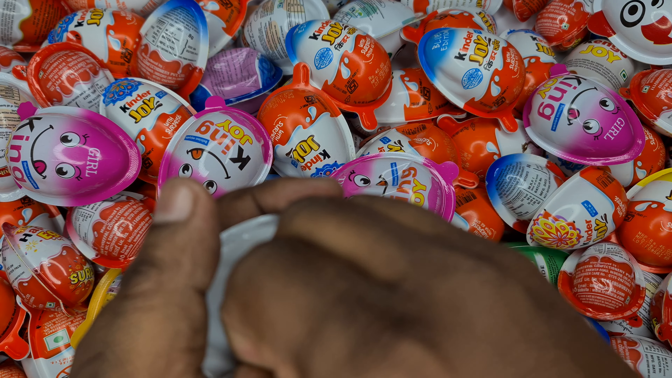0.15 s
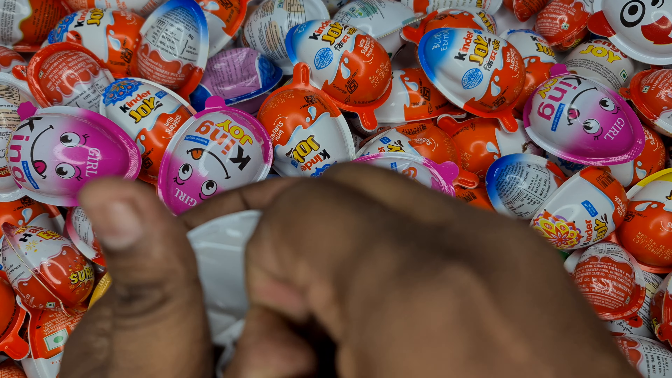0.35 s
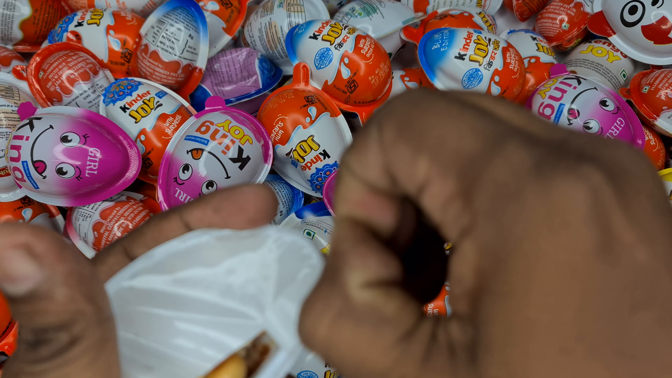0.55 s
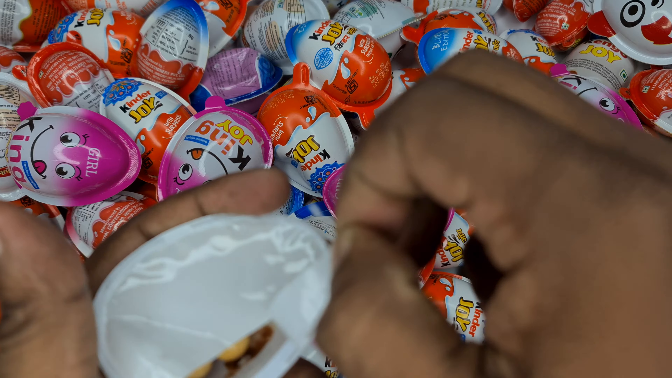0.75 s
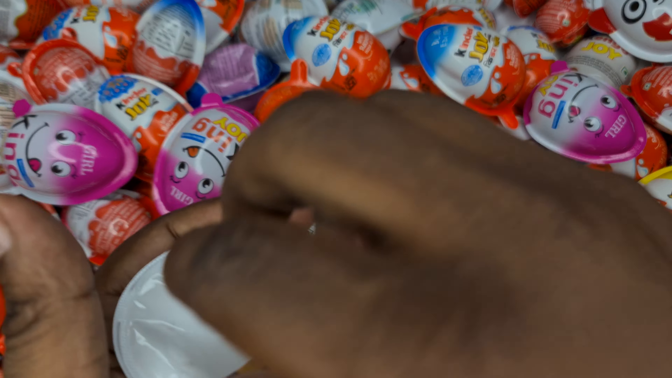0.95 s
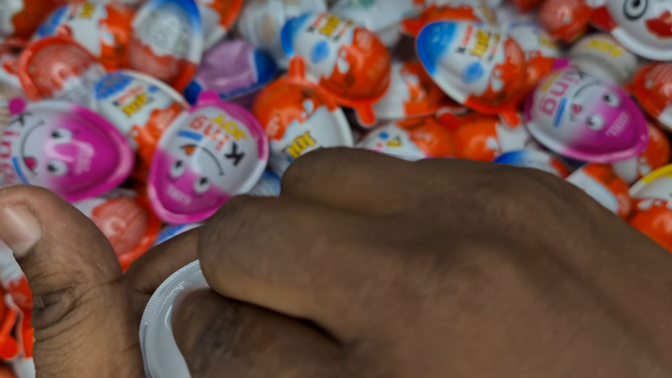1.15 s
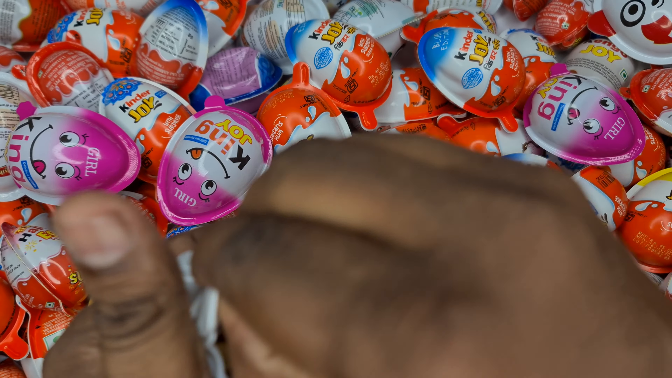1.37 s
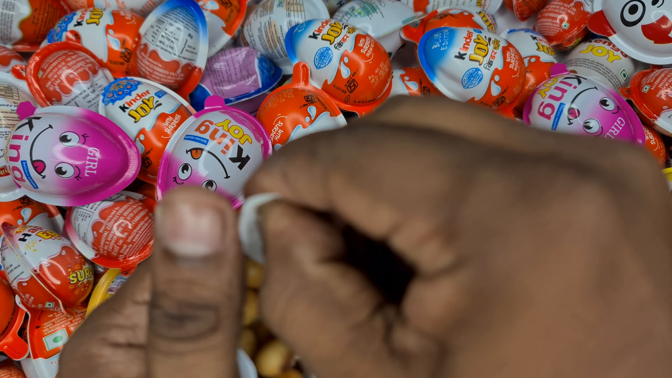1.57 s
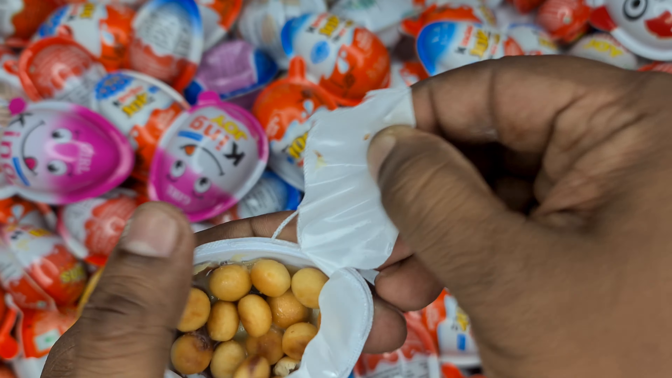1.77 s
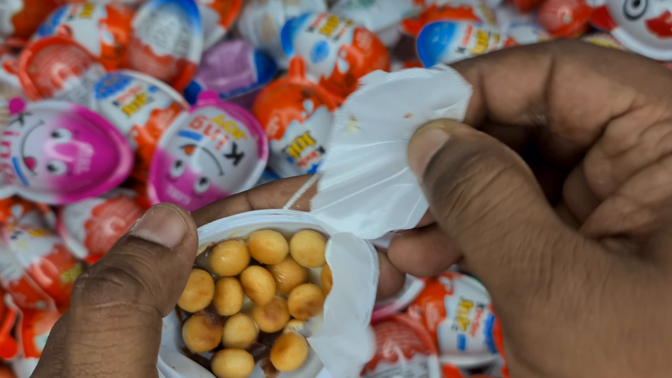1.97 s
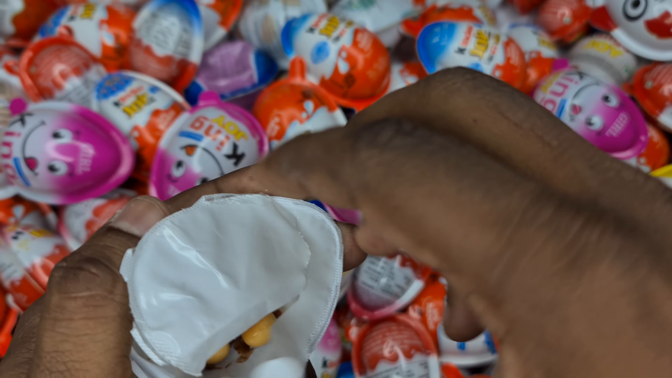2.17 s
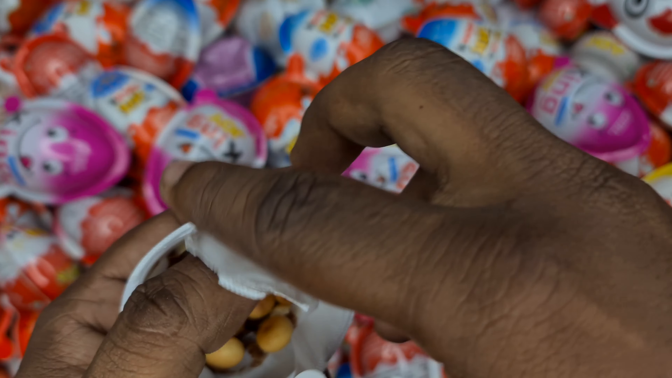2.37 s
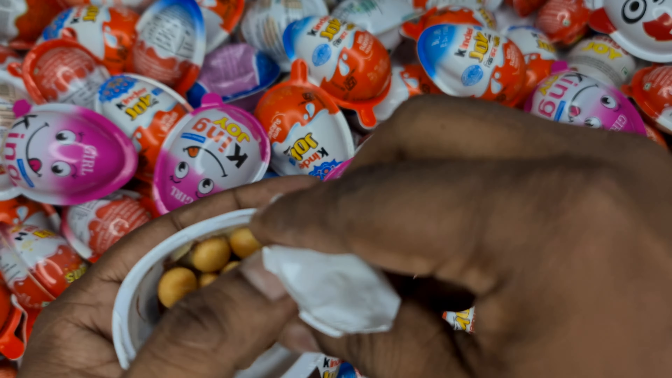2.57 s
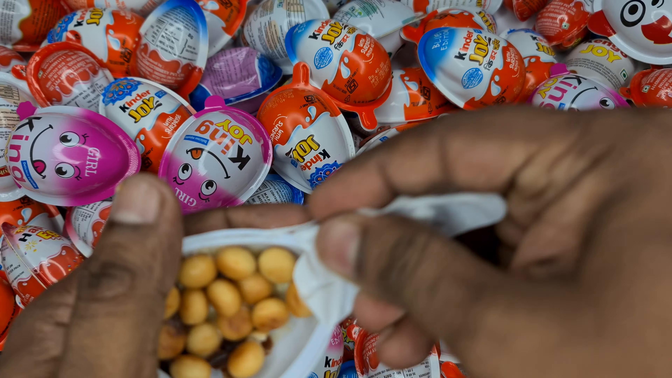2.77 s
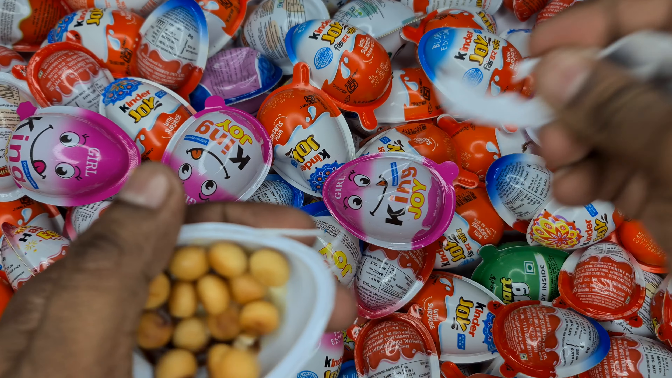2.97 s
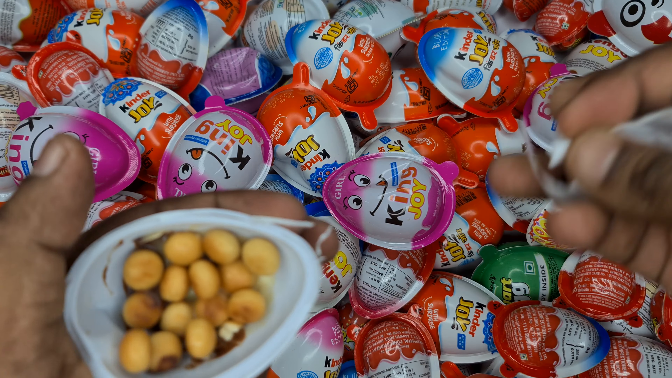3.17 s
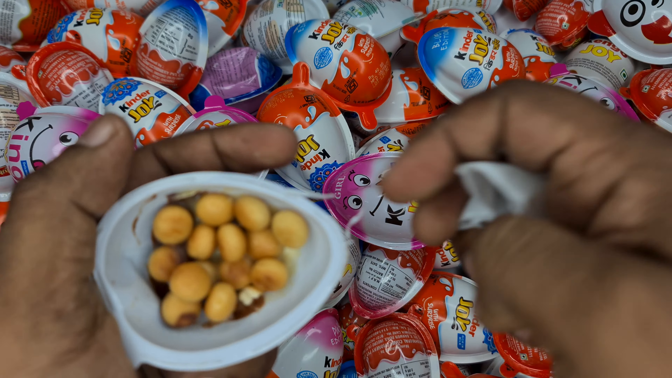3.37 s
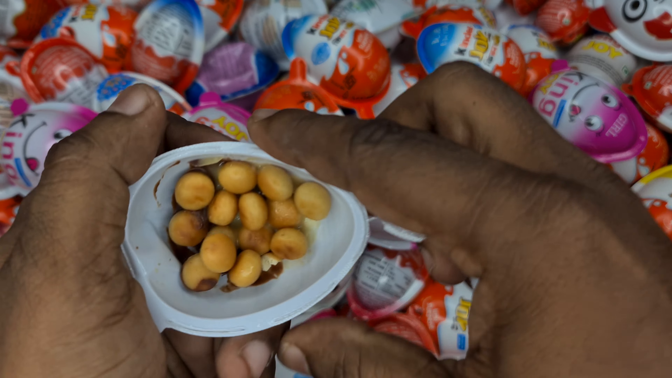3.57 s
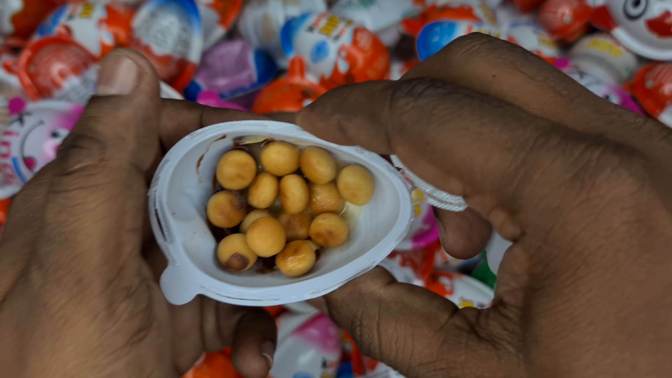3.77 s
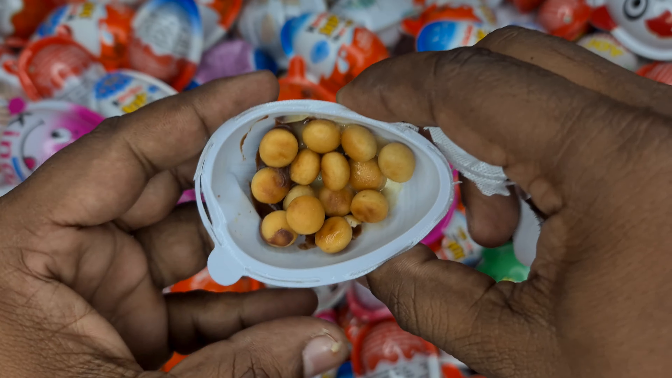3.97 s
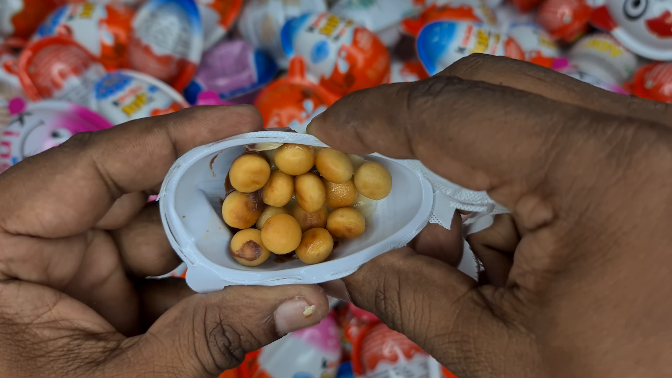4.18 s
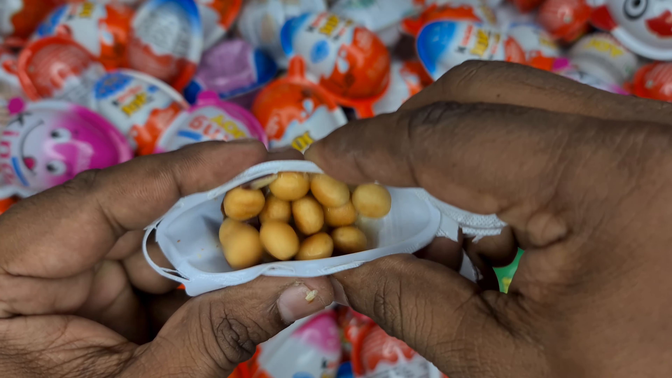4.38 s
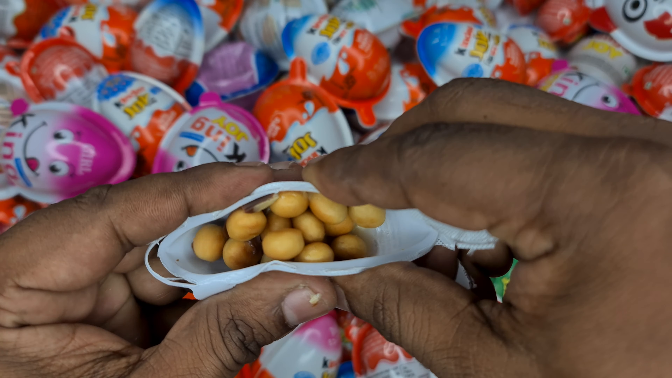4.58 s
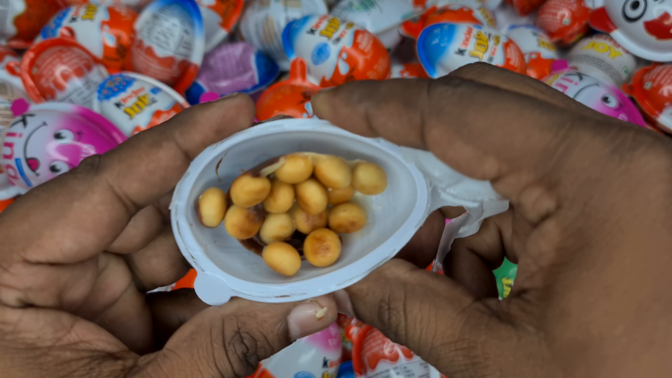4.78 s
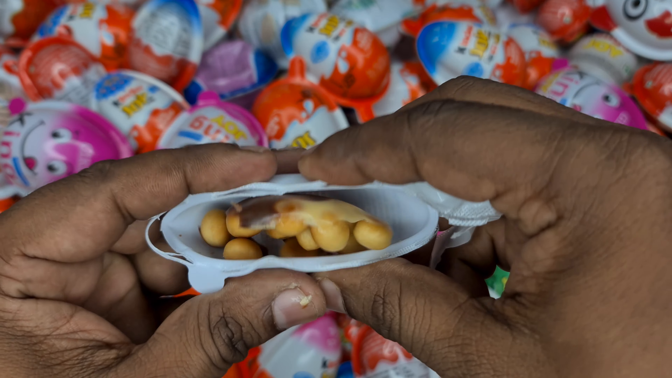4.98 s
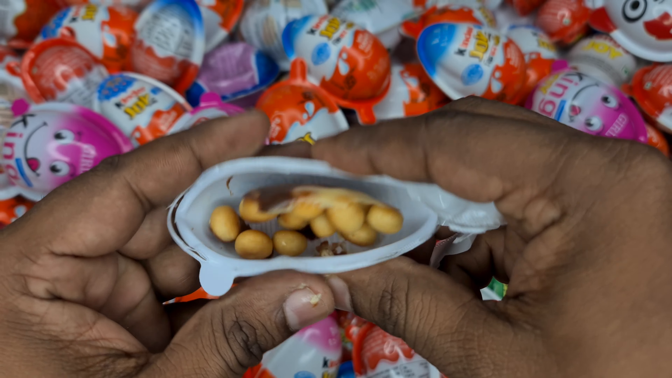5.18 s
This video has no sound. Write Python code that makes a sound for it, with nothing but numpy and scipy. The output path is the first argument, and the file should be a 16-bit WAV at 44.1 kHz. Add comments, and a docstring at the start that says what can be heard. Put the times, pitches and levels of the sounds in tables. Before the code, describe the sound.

A very close, dry stereo sound of a foil seal being torn from a thin plastic cup in a small hard room. From 0 to 0.65 s, fast bright crackles build to a hard, thumping snap at about 0.45 s. A brief lull follows, with weak ticks, then crisp crinkles from 1.15 to 1.45 s and a loud dense tear from 1.53 to 1.75 s. Sparse, thin foil crinkles continue between 1.8 and 2.6 s, with a soft low handling bump near 2.7 s. A sharp, sizzling rip bursts at 2.9 to 3.0 s, then a small click at 3.26 s. From 3.4 to 4.2 s it is nearly silent: tiny ticks, faint hiss and barely audible far-off tones. Squeezing the cup gives sharp plastic pops with short scrapes and puffs at 4.28, 4.48 and 4.77 s, then small crackles and a last click at 5.2 s.

```python
"""Hands peel and tear a foil seal off a thin plastic cup, then squeeze the cup, close to a two-port microphone.
Each buckle is a noise burst filtered into a thump, a shell ring, a crack and a foil sizzle; showers of small
crinkles fill the tears and partly fuse into a scrape. Damped low swings make the puffs, band noise the hands'
rumble, and decaying noise a small hard room. Below lie a quiet noise floor, a hum and faint gliding tones."""
import sys
import numpy as np
from scipy import signal
from scipy.fft import rfft, irfft, next_fast_len
from scipy.io import wavfile

SR = 44100
rng = np.random.default_rng(int(sys.argv[2]) if len(sys.argv) > 2 else 0)


def output_pcm(signal):
    """Save a mono or channel-first signal as 16-bit PCM at the path in sys.argv[1].

    Samples are clipped to [-1, 1] before scaling.
    """
    pcm = np.clip(np.atleast_2d(signal).T, -1, 1) * 32767
    wavfile.write(sys.argv[1], SR, np.round(pcm).astype(np.int16))


N = 230671  # length in samples

# All levels are those at the source, before the colour of the microphone ports.
# Noise floor, relative spectral density: (frequency [Hz], level [dB per Hz])
FLOOR_SPECTRUM = [(18, -40), (30, 13.5), (95, 11), (273, -10.5), (404, 8), (569, -11), (1760, -5.5),
                  (6210, -32.5), (7090, -57.5), (14800, -32), (16000, -13.5)]
FLOOR_DB = -72  # rms of the whole floor
# Steady hum: (frequency [Hz], rms level [dB])
HUM_TONES = [(100, -81)]
# Rumble of the hands: (time [s], level [dB])
HAND_RUMBLE = [(0, -71), (.4, -80), (.45, -48), (.72, -79.5), (1.15, -82.5), (1.42, -70.5), (1.9, -72),
               (2.3, -75), (2.57, -68), (2.64, -50.5), (2.72, -58), (2.87, -59.5), (3.2, -77), (3.26, -59),
               (3.33, -75), (4.24, -83.5), (4.28, -66), (4.34, -73.5), (4.47, -60), (4.52, -80),
               (4.77, -78), (5.23, -72)]
# Bursts of small crinkles, one per pull or squeeze: (peak time [s], rise [s per 20 dB], fall [s per 20 dB],
# shell level [dB], foil level [dB re shell], thump level [dB re shell], share fused into a smooth scrape [0-1])
CRINKLE_BURSTS = [(0.0, .02, 0.055, -30, -12, -30, 0), (0.145, 0.093, 0.1, -30.5, -5, -26, 0),
                  (0.306, 0.057, 0.06, -24.5, -5, -16.5, 0.11), (.449, 0.016, 0.13, -17.5, -5, -22, 0),
                  (0.485, 0.038, 0.093, -22.5, -21, -9.5, 0), (.535, .04, 0.02, -24, -5, -17, .2),
                  (.781, 0.29, 0.042, -60, -6, -6, 0.96), (.868, 0.023, 0.027, -51.5, -3, -27, .4),
                  (1.06, 0.03, 0.1, -40.5, -24, -16, 0.19), (1.161, 0.017, 0.38, -34.5, -3, -29, 0.091),
                  (1.415, 0.056, 0.07, -33.5, 3, -30, 0.66), (1.543, 0.033, 0.058, -17, 1, -35, 0.036),
                  (1.68, 0.046, 0.067, -19.5, 1.5, -15, 0), (1.719, 0.046, 0.017, -26, 0, -12.5, 0),
                  (1.873, 0.094, 0.043, -41.5, 3, -14, 0), (1.924, 0.083, 0.11, -55.5, 11, -6.5, 0.1),
                  (2.073, 0.082, 0.16, -46, -1.5, -18, 0.17), (2.336, 0.022, 0.16, -50.5, 5, -21, 0.52),
                  (2.443, 0.045, 0.12, -42, -6, -22, 0.033), (2.574, 0.053, 0.18, -47.5, 2, -23, 0.054),
                  (2.639, 0.049, 0.23, -41.5, -1, -18, 0.093), (2.822, 0.18, 0.035, -35.5, 3.5, -16, 0.11),
                  (2.934, 0.096, 0.17, -36, 3, -14, 0.66), (3.18, 0.19, 0.27, -58.5, 9, -3, .4),
                  (3.257, 0.018, 0.031, -29, -2, -42, 0.035), (3.398, 0.063, .037, -42, 3.5, -19, 0.3),
                  (3.471, 0.13, 0.28, -60.5, 3, -11, 0.44), (3.652, 0.047, 0.47, -62.5, -2, -8.5, 0.027),
                  (3.816, 0.023, 0.024, -56.5, 11.5, -19.5, 0.25),
                  (4.013, 0.21, 0.19, -68.5, -0.5, -6, 0.23), (4.134, 0.05, .1, -52.5, 3, -13, 0.16),
                  (4.281, .016, 0.049, -47, 13, -20, 1), (4.417, 0.08, 0.28, -51, -14, -29, 0.51),
                  (4.495, 0.027, 0.15, -32, 8, -21, 0.98), (4.6, 0.24, 0.054, -40, -1, -25, 0.21),
                  (4.768, 0.025, 0.11, -28, -5.5, -24, 0.14), (5.043, 0.068, 0.078, -37, -3.5, -21, 0.014),
                  (5.23, 0.04, .05, -41, -6, -19, 0.81)]
# Central pitch of the held shell in the crinkles: (time [s], frequency [Hz])
GRIP_PITCH = [(0.0, 1170), (0.06, 2160), (0.57, 1760), (0.6, 2380), (0.9, 2610), (0.99, 1696), (2.02, 1580),
              (2.05, 2690), (2.26, 1397), (2.3, 2460), (3.23, 1740), (3.32, 2590), (3.67, 1370),
              (5.23, 2696)]
RING_SPREAD_OCT = 0.55  # scatter of each crinkle about that pitch
# Modes of the cup shell, mean weights: (frequency [Hz], width [Hz], level [dB])
CUP_MODES = [(380, 10, 6.5), (757, 36, -18.5), (1251, 360, 4), (1880, 70, -25.5), (2690, 390, 5.5),
             (3300, 150, 1.5)]
# Modes of the foil, mean weights: (frequency [Hz], width [Hz], level [dB])
FOIL_MODES = [(4880, 140, 8), (6360, 2700, -6.5), (8880, 660, 8), (11500, 2200, 3.5), (14400, 4500, -7)]
# Snaps that stand out singly: (time [s], shell ring [Hz], thump peak [dB], shell peak [dB],
# crack peak [dB], sizzle peak [dB])
LOUD_SNAPS = [(0.013, 1390, -37, -14.5, -35, -40), (0.062, 1800, -53, -17, -20.5, -23),
              (0.083, 2780, -43, -9.5, -20, -34.5), (0.118, 1290, -52, -31, -35, -41.5),
              (0.136, 1780, -54, -15.5, -19.5, -28), (0.149, 1610, -51.5, -20.5, -13.5, -18),
              (0.191, 2900, -54.5, -32, -20, -29), (0.217, 2940, -61, -34.5, -37.5, -36.5),
              (0.236, 2900, -57, -24, -19, -27.5), (0.251, 1130, -58, -28.5, -20.5, -32),
              (0.264, 2870, -65, -31, -29.5, -36.5), (0.281, 1770, -40, -18.5, -22.5, -36),
              (0.292, 1360, -39, -21.5, -15.5, -28), (0.3, 1980, -37, -16, -19, -28.5),
              (0.312, 790, -36, -17, -22, -27), (0.334, 2830, -47.5, -25, -14.5, -14.5),
              (0.413, 1670, -61.5, -30.5, -27.5, -51.5), (0.443, 1740, -30.5, -1, -4, -19),
              (0.457, 1810, -26, -12, -23, -25), (0.484, 1460, -21, -9.5, -31, -24),
              (0.49, 1280, -17, -12, -17, -25), (0.512, 1260, -26, -18, -19, -28),
              (0.521, 1790, -26.5, -28, -23, -21), (0.53, 2750, -30, -17, -27, -30),
              (0.536, 1970, -33, -18, -17, -27), (0.596, 2500, -50, -24.5, -27, -39),
              (0.616, 2810, -62, -17, -35, -42), (0.637, 2780, -70, -14.5, -32, -23),
              (0.739, 1820, -46.5, -40, -58, -61.5), (0.772, 2370, -62, -35.5, -51, -33.5),
              (0.784, 2530, -70, -36, -50, -45), (0.86, 2230, -62.5, -25.5, -32.5, -34),
              (0.941, 2820, -58.5, -49, -68, -72), (0.967, 1590, -62, -47, -75, -75),
              (1.031, 1850, -45, -24, -49, -47), (1.048, 1240, -53, -29.5, -62, -65),
              (1.068, 2360, -66, -25, -50, -57), (1.082, 1210, -46, -27.5, -48, -62),
              (1.107, 1920, -59, -38.5, -49.5, -66), (1.129, 1290, -48, -34, -52, -60),
              (1.159, 1340, -38.5, -9.5, -10, -14), (1.178, 2730, -45.5, -10.5, -32, -29),
              (1.205, 1300, -48.5, -16.5, -34.5, -42.5), (1.212, 1270, -49, -20.5, -35.5, -43),
              (1.242, 2810, -53, -24.5, -10.5, -12.5), (1.253, 2690, -53, -23, -12.5, -19),
              (1.287, 1970, -62, -21, -18, -17.5), (1.323, 1270, -57, -28, -25.5, -36.5),
              (1.337, 1290, -65, -31.5, -30, -22.5), (1.344, 1270, -69.5, -43, -27.5, -19.5),
              (1.38, 1190, -52, -20.5, -12.5, -20.5), (1.388, 2560, -60.5, -26.5, -28, -24),
              (1.404, 1560, -56.5, -20.5, -10.5, -17.5), (1.412, 1280, -52, -19.5, -14.5, -17.5),
              (1.42, 1290, -57, -17, -8, -19), (1.438, 1260, -54.5, -21, -12, -19),
              (1.477, 1320, -64, -27.5, -22, -33), (1.489, 2070, -57.5, -36, -23.5, -30.5),
              (1.533, 1820, -39, -10.5, -14, -5), (1.553, 2250, -23, -3.5, -8, -15.5),
              (1.573, 2040, -33, -22.5, -5, -16.5), (1.645, 1720, -26.5, -11, -12, -14.5),
              (1.66, 1740, -25, -13.5, -9.5, -22.5), (1.672, 3280, -28, -5, -20, -11),
              (1.677, 1750, -26.5, -18.5, -0.5, -24), (1.723, 1700, -22.5, -14, -22.5, -21),
              (1.812, 1680, -33, -19.5, -16.5, -18.5), (1.822, 1300, -45.5, -36, -30, -34),
              (1.861, 1050, -45, -21.5, -20.5, -40), (1.874, 710, -39, -39, -25.5, -25),
              (1.917, 1090, -48.5, -30.5, -24.5, -33), (1.922, 2000, -45, -25, -17.5, -22),
              (2.006, 1590, -47, -25, -26, -21), (2.029, 1480, -46.5, -29.5, -45, -49),
              (2.064, 2130, -43.5, -21.5, -14, -18), (2.094, 1660, -62, -45.5, -26, -38),
              (2.109, 3090, -55.5, -32, -35, -43), (2.125, 1007, -51.5, -35.5, -46.5, -44.5),
              (2.167, 1730, -57, -40.5, -55, -58), (2.328, 2300, -65, -40, -39, -59),
              (2.361, 2460, -76, -41, -44, -30), (2.386, 2900, -75, -63, -35, -28.5),
              (2.428, 1450, -43, -38, -29, -39), (2.444, 2330, -53, -28.5, -26.5, -31),
              (2.479, 1860, -49, -35, -24.5, -29.5), (2.535, 1290, -60.5, -35.5, -54, -57),
              (2.566, 2250, -45, -24, -38, -20.5), (2.626, 3320, -48.5, -25, -10.5, -33.5),
              (2.641, 1620, -29.5, -24, -11.5, -22), (2.691, 2160, -54.5, -28, -22, -35),
              (2.738, 2760, -37.5, -25.5, -17.5, -12), (2.771, 1080, -51, -35.5, -27.5, -25.5),
              (2.787, 1920, -43.5, -28, -22.5, -21), (2.803, 1790, -43.5, -22, -22, -29.5),
              (2.815, 3020, -55, -26, -15, -19.5), (2.829, 2460, -40.5, -22, -16.5, -26),
              (2.894, 1870, -42, -15.5, -11.5, 1), (2.914, 2470, -60, -26, -20, -30.5),
              (2.922, 2520, -48.5, -21.5, -9, -17), (2.929, 2040, -46, -18, -13.5, -14.5),
              (2.936, 1970, -42.5, -10, -13, -4.5), (2.94, 1750, -27.5, -4.5, -11, -9),
              (2.97, 2120, -27, -3, -4, -5.5), (3.042, 1820, -51, -26, -30, -43),
              (3.1, 1910, -60.5, -27, -39.5, -40), (3.116, 2950, -48.5, -36.5, -34.5, -37),
              (3.171, 2690, -57, -43, -29, -22.5), (3.178, 1040, -39.5, -32, -36, -26),
              (3.254, 1150, -30, -24, -34, -24), (3.262, 2020, -31, -28, -15, -14),
              (3.272, 2640, -59.5, -22.5, -17, -28), (3.379, 2660, -47.5, -33, -45.5, -46),
              (3.403, 2130, -65, -32, -44, -45), (3.446, 2090, -60, -49.5, -59.5, -61.5),
              (3.459, 1940, -70, -34.5, -34.5, -33), (3.524, 1720, -62, -56, -60, -59.5),
              (3.544, 1020, -51, -46.5, -54, -35.5), (3.65, 3200, -61.5, -44, -35.5, -40.5),
              (3.679, 730, -44, -50.5, -58, -58.5), (3.698, 860, -50.5, -34, -39, -57),
              (3.74, 3040, -70, -54, -50, -54.5), (3.749, 2970, -64, -50.5, -43, -42),
              (3.918, 1224, -54.5, -50.5, -71, -66), (3.951, 2120, -69.5, -55.5, -56, -58),
              (4.005, 2850, -64.5, -60, -60.5, -63), (4.024, 1740, -65.5, -58.5, -70, -46.5),
              (4.084, 2440, -65.5, -56.5, -51.5, -49), (4.128, 1790, -67.5, -41, -36.5, -37.5),
              (4.169, 1670, -57, -41, -54, -60.5), (4.242, 1820, -73, -59, -57.5, -45.5),
              (4.278, 1620, -27.5, -17.5, -14, -3), (4.284, 1990, -56, -21, -15, -13.5),
              (4.376, 2620, -47.5, -32.5, -30, -36), (4.45, 2400, -48, -19.5, -17.5, -36),
              (4.485, 1730, -30.5, -8, -9, 1), (4.594, 2180, -53, -46, -39, -37),
              (4.612, 2540, -58, -36, -41, -44), (4.707, 3450, -60, -27, -29, -25),
              (4.724, 2630, -46, -28.5, -44, -48), (4.76, 1820, -44, -12.5, -41, -36),
              (4.764, 3060, -32.5, -9, -7, -6), (4.804, 1960, -22, -10.5, -7.5, -12),
              (4.84, 3520, -54, -39, -21, -39), (4.852, 3330, -49, -26.5, -43, -40),
              (4.996, 3290, -50, -39, -34.5, -47), (5.038, 1750, -52, -32, -25, -35),
              (5.046, 1860, -42, -29, -21.5, -23.5), (5.053, 2230, -48, -31, -32, -30),
              (5.071, 2620, -41, -31, -46, -49), (5.103, 2650, -53, -33, -49, -37),
              (5.128, 2570, -62, -42.5, -58, -61), (5.164, 1960, -59, -46.5, -55, -46),
              (5.195, 2160, -72, -31, -46, -47), (5.212, 2450, -35.5, -9.5, -18.5, -34)]
SNAP_PAN_DB, SNAP_PAN_SPREAD_DB = -0.5, 2.5  # mean and scatter, left minus right
GRAIN = 512  # samples in one buckle
RISE_S, SPIKE, SPIKE_S = 0.0005, 1.34, 0.00026  # onset, then strength and decay of the initial spike
RAGGED_DB = 3.5  # scatter of the jerks within a buckle
# Place of the hands, as lag of the right port behind the left: (time [s], lag [s])
HAND_LAG = [(0, 0.00027), (1.5, .00025), (1.7, 0.00021), (2.5, 0.00024), (3.1, 0.00021), (3.18, .00001),
            (3.5, 0.0000332), (3.7, .0002), (4.8, 0.0002), (5.2, 0.00032)]
LAG_SPREAD_S = 0.00004
# Decay of the room, relative band levels: (frequency [Hz], T60 [s], level [dB])
ROOM_BANDS = [(265, 0.76, -33), (756, 0.47, -46), (1423, 0.1, -20.5), (3270, 0.5, -24), (6000, 0.3, -7.5),
              (8700, 0.28, -25), (13500, 0.77, -32)]
# Rasp of the shell over the crinkle level: (time [s], level [dB])
RASP_PRESS = [(0, -3), (.6, 5), (.75, 3.5), (1.15, 2.5), (4.2, -1), (4.5, 2), (4.7, -2), (5.23, -2)]
SCRAPE_LAG_S = 0.00024
# Puffs of air as the shell pops: (time [s], undamped amplitude [dB], pitch [Hz], decay to 1/e [cycles])
AIR_PUFFS = [(.545, -42, 90.5, 1.1), (1.669, -43, 59.6, .4), (1.812, -40.5, 120, 0.4),
             (1.876, -43.5, 380, 2.9), (2.645, -57, 71, .6), (2.623, -55, 172.5, 0.53),
             (2.698, -37, 136, 1.8), (2.723, -40, 160, 1.1), (2.74, -44, 170, .8), (2.756, -54, 150, 1.2),
             (3.256, -47, 90, 0.18), (4.276, -26, 92.3, 0.15), (4.449, -36, 160, 0.24),
             (4.483, -29, 140, 0.28), (5.089, -43, 49.6, .4)]
# Faint far tones, one list per glide: (time [s], pitch [Hz], rms level [dB])
FAR_GLIDES = [
    [(3.36, 323.5, -77), (3.45, 272.5, -76.5), (3.57, 227, -73.5)],
    [(3.72, 250, -79), (3.86, 362, -80.5), (3.97, 418, -89), (4.08, 445, -72), (4.16, 406, -86.5)],
    [(4.86, 265, -73), (4.95, 251, -77), (5.03, 267, -67)],
]
# Colour of the microphone ports: (frequency [Hz], width [Hz], left gain [dB], right gain [dB])
PORT_COLOUR = [(381, 40, 3, 1), (790, 180, 9, 8.5), (1784, 470, -3.5, 2), (2460, 230, 3.5, 0.5),
               (4050, 1040, 0, -4.5), (4430, 350, -5.5, 0.5), (7000, 4100, -0.5, -1.5),
               (9100, 1400, 1.5, -4), (14600, 1600, -7, -26)]
LOW_CUT_HZ, TOP_HZ = 49, 15900
CEILING = 0.94  # full scale = 1


def undb(db):
    """The decibel law: amplitude ratio of a level."""
    return 10 ** (np.asarray(db) / 20)


def curve(table):
    """Linear interpolation: columns of a table joined by straight lines, one value a sample."""
    s, *columns = np.transpose(table)
    return [np.interp(np.arange(N) / SR, s, c) for c in columns]


def resonance(f, hz, width):
    """Damped resonance: complex response of a band-pass, gain 1 at the centre."""
    return 1 / (1 + 1j * (f ** 2 - hz ** 2) / (np.maximum(f, 1) * width))


def band(x, hz, width):
    """Cascaded resonance: a steeper band of a long signal, rms 1."""
    size = next_fast_len(x.shape[-1])
    response = resonance(np.fft.rfftfreq(size, 1 / SR), hz, width) ** 2
    y = irfft(rfft(x, size) * response, size)[..., :x.shape[-1]]
    return y / np.sqrt(np.mean(y ** 2))


def two_ports(mid, side):
    """Sum and difference: the common field plus an opposed field at the left and right ports."""
    return mid + side * np.array([[1], [-1]])


def floor():
    """Stationary noise of a given spectral density, more coherent between the ports in the bass."""
    f = np.maximum(np.fft.rfftfreq(N, 1 / SR), 1)
    hz, db = np.transpose(FLOOR_SPECTRUM)
    density = undb(np.interp(np.log(f), np.log(hz), db))
    mid, side = rfft(rng.standard_normal((2, N))) * density
    noise = irfft(two_ports(mid, np.clip(0.5 + f / 1500, 0, 1) * side), N)
    return noise * undb(FLOOR_DB) / np.sqrt(np.mean(noise ** 2))


def hum():
    """Simple harmonic motion: a steady sine, alike at both ports."""
    t = np.arange(N) / SR
    return sum(np.sqrt(2) * undb(db) * np.sin(2 * np.pi * hz * t) for hz, db in HUM_TONES)


def rumble(db):
    """Amplitude-modulated band noise: the low lumpy rumble of the moving hands and cup."""
    mid, side = (band(band(rng.standard_normal(N), 100, 460), 98, 370) for _ in range(2))
    lumps = undb(band(rng.standard_normal(N), 8.5, 30))
    return undb(db) * lumps * two_ports(mid, 0.5 * side)


def bursts(step_s=0.001):
    """Addition of powers: bursts swell and die exponentially, and the louder one sets the colour."""
    peak_s, rise_s, fall_s, shell_db, foil_db, thump_db, share = np.transpose(CRINKLE_BURSTS)[..., None]
    t = np.arange(0, N / SR + step_s, step_s)
    late = t - peak_s
    drop_db = 20 * np.where(late < 0, -late / rise_s, late / fall_s)
    power = undb(shell_db - drop_db) ** 2 + 1e-30
    total = power.sum(0)

    def mean_db(db):
        return 10 * np.log10((power * undb(db) ** 2).sum(0) / total)

    mean_share = (power * share).sum(0) / total
    return curve(np.transpose([t, 10 * np.log10(total), mean_db(foil_db), mean_db(thump_db), mean_share]))


def part(broad, detail, burst_s, alike, db):
    """Impulsive excitation of a filter: one part of each buckle at both ports, and its energy for the room."""
    t = np.arange(GRAIN) / SR
    envelope = (1 - np.exp(-t / RISE_S)) * (np.exp(-t / burst_s) + SPIKE * np.exp(-t / SPIKE_S))
    noise = rng.standard_normal((len(db), 3, GRAIN)) * envelope
    # a buckle lets go in several jerks, so the burst is ragged
    jerks = undb(RAGGED_DB * rng.standard_normal((len(db), 1, GRAIN // 16)))
    noise = noise * np.repeat(jerks, 16, axis=2)
    ports = np.sqrt(alike) * noise[:, :1] + np.sqrt(1 - alike) * noise[:, 1:]
    spectrum = rfft(ports) * broad * detail
    peak = np.abs(irfft(spectrum, GRAIN)).max(axis=2, keepdims=True)
    spectrum = spectrum / peak * undb(db)[:, None, None]
    # averaged over all directions the fine colour evens out and only the energy is kept
    energy = np.mean(np.abs(spectrum) ** 2, axis=(1, 2), keepdims=True) / np.mean(np.abs(broad) ** 2)
    return np.concatenate([spectrum, broad * np.sqrt(energy)], axis=1)


def buckles(s, ring_hz, thump_db, shell_db, crack_db, sizzle_db, pan_db, burst=0.86):
    """Modal superposition: randomly weighted modes of sheet and shell; rows: left port, right port, room."""
    f = np.fft.rfftfreq(GRAIN, 1 / SR)
    chance = rng.standard_normal((len(s), 12, 1, 1))
    cup = sum(undb(db + 6 * chance[:, k]) * resonance(f, hz, w) for k, (hz, w, db) in enumerate(CUP_MODES))
    foil = sum(undb(db + 1.8 * chance[:, 6 + k]) * resonance(f, hz, w)
               for k, (hz, w, db) in enumerate(FOIL_MODES))
    ring_hz = ring_hz[:, None, None]
    ring = resonance(f, ring_hz, 0.43 * ring_hz) ** 2

    thump = part(resonance(f, 453, 900) ** 2, 1, 0.00097 * burst, 0.84, thump_db)
    shell = part(resonance(f, 1960, 3600) ** 3, ring + 0.15 * cup + 0.13, 0.0013 * burst, 0.82, shell_db)
    crack = part(resonance(f, 4170, 5500) ** 2, 0.34 * foil + 1, 0.0022 * burst, 0.24, crack_db)
    sizzle = part(resonance(f, 10500, 15000) ** 2, 0.16 * foil + 1, 0.0022 * burst, 0.45, sizzle_db)

    right_lag = np.interp(s, *np.transpose(HAND_LAG)) + LAG_SPREAD_S * chance[:, 11, 0, 0]
    lag = np.maximum(np.stack([0 * s, right_lag, 0 * s], axis=1), 0)[..., None]
    # long waves bend round the microphone body and reach both ports almost together
    bend = f ** 2 / (f ** 2 + 800 ** 2)
    gain = undb(np.stack([pan_db, -pan_db, 0 * s], axis=1) / 2)[..., None]
    place = gain * np.exp(-2j * np.pi * f * bend * lag)
    grains = irfft((thump + shell + crack + sizzle) * place, GRAIN)
    at = np.clip((s * SR).astype(int), 0, N)[:, None] + np.arange(GRAIN)
    return np.array([np.bincount(at.ravel(), grains[:, c].ravel(), N + GRAIN)[:N] for c in range(3)])


def crinkles(shell_db, foil_db, thump_db, share, count=2600):
    """Random superposition of impulses: a dense shower of buckles, few large and many small."""
    when, size = rng.random((count, 2)).T
    scatter = rng.standard_normal((count, 4)).T
    i = (when * (N - 1)).astype(int)
    size_db = 0.5 - 1.87 * np.log(size + 1e-6)
    # the share that fuses into the scrape is taken from the shower
    shell = shell_db[i] + size_db + 10 * np.log10(1.001 - share[i])
    foil = shell + foil_db[i] + 1.9 * scatter[0]
    thump = shell + thump_db[i] + 3.9 * scatter[1]
    ring_hz = np.clip(curve(GRIP_PITCH)[0][i] * 2 ** (RING_SPREAD_OCT * scatter[3]), 500, 4500)
    return buckles(i / SR, ring_hz, thump, shell, foil - 2.5, foil - 3.5, 0.83 * scatter[2], burst=1.0)


def loud_snaps():
    """Isolated snap-through buckling: each snap starts just before its listed time, a little to one side."""
    s, *columns = np.transpose(LOUD_SNAPS)
    pan_db = SNAP_PAN_DB + SNAP_PAN_SPREAD_DB * rng.standard_normal(len(s))
    return buckles(s - 0.0007, *columns, pan_db)


def room(x, size=32768):
    """Diffuse reverberation: noise decaying exponentially by band, more alike at both ports in the bass."""
    t = np.arange(size) / SR
    tail = 0
    for hz, t60, db in ROOM_BANDS:
        mid, side = band(rng.standard_normal((2, size)), hz, 1.7 * hz)
        tail = tail + undb(db - 60 * t / t60) * two_ports(mid, min(hz / 1100, 1) * side)
    # reflections build up a few milliseconds after the direct sound
    tail = tail * np.clip((t - 0.003) / 0.0012, 0, 1) * undb(-35)
    return signal.fftconvolve(x[None], tail, axes=1)[:, :N]


def scrape(shell_db, foil_db, share, press_db):
    """Sliding friction as continuous noise: a fluttering rasp in the shell and a fine hiss in the foil."""
    flutter = undb(0.83 * band(rng.standard_normal(N), 61, 130))
    common, left, right = rng.standard_normal((3, N))
    delayed = np.roll(common, int(SCRAPE_LAG_S * SR))
    ports = np.array([common + 0.25 * left, delayed + 1.5 * right])
    # the shell passes a tight band
    shell = band(band(band(ports, 2000, 2600), 2200, 2400), 2300, 2200)
    rasp = flutter * undb(press_db) * shell
    hiss = undb(foil_db - 2.0) * band(band(ports, 7800, 11000), 5900, 13000)
    return np.sqrt(share) * undb(shell_db) * (rasp + hiss)


def puffs():
    """Damped free oscillation: a soft low swing of air, quickly damped, for each pop."""
    t = np.arange(N) / SR
    out = 0
    for s, db, hz, cycles in AIR_PUFFS:
        turns = np.maximum(t - s, 0) * hz
        out = out + undb(db) * np.sin(2 * np.pi * turns) * np.exp(-turns / cycles)
    return out


def far_tones():
    """Frequency modulation: phase is the running sum of a gliding pitch that wavers along with the level."""
    t = np.arange(N) / SR
    waver = 1.8 * band(rng.standard_normal(N), 17, 24)
    out = 0
    for table in FAR_GLIDES:
        hz, db = curve(table)
        fade = np.clip(np.minimum(t - table[0][0], table[-1][0] - t) / 0.011, 0, 1)
        phase = 2 * np.pi * np.cumsum(hz * (1 + 0.0073 * waver)) / SR
        out = out + np.sqrt(2) * fade * undb(db + waver) * np.sin(phase)
    return out


def scene():
    """Linear superposition: all sources add at the ports, and the buckles also excite the room."""
    shell_db, foil_db, thump_db, share = bursts()
    near = loud_snaps() + crinkles(shell_db, foil_db, thump_db, share)
    rubbing = scrape(shell_db, foil_db, share, *curve(RASP_PRESS))
    handling = puffs() + rumble(*curve(HAND_RUMBLE))
    return near[:2] + room(near[2]) + rubbing + handling + floor() + hum() + far_tones()


def record(dry):
    """Port resonances, then saturation: the recorder rounds the loudest peaks and cuts the top."""
    size = next_fast_len(N + GRAIN)
    f = np.fft.rfftfreq(size, 1 / SR)
    colour = np.prod([1 + (undb([[left], [right]]) - 1) * resonance(f, hz, w)
                      for hz, w, left, right in PORT_COLOUR], axis=0)
    colour = colour * (1j * f / (LOW_CUT_HZ + 1j * f)) ** 2
    coloured = irfft(rfft(dry, size) * colour, size)[:, :N]
    rounded = CEILING * np.tanh(coloured / CEILING)
    return signal.sosfilt(signal.ellip(8, 0.2, 50, TOP_HZ, fs=SR, output="sos"), rounded)


dry = scene()
out = record(dry)
output_pcm(out)
```